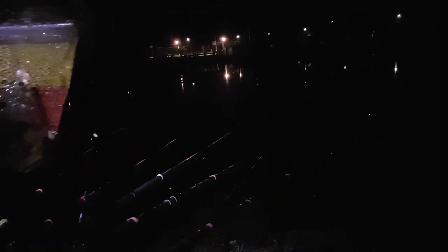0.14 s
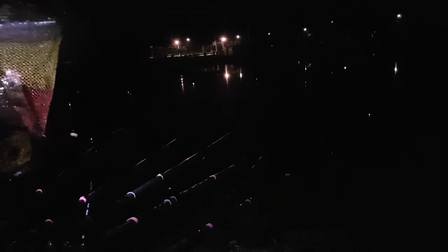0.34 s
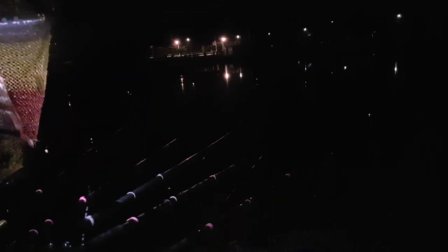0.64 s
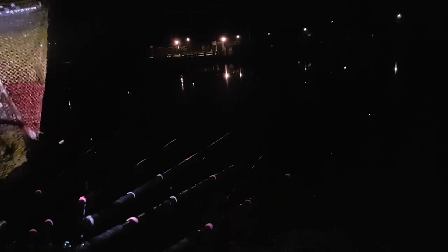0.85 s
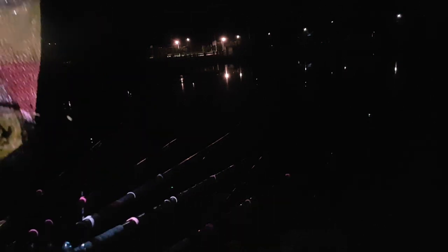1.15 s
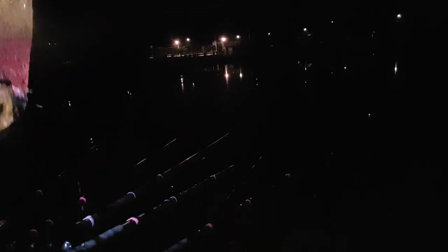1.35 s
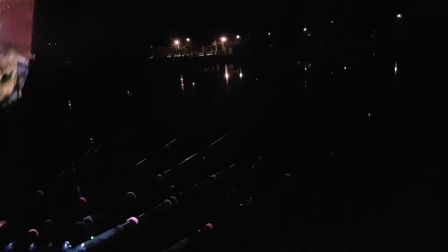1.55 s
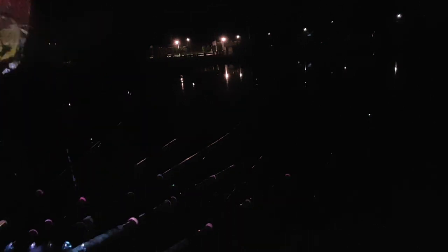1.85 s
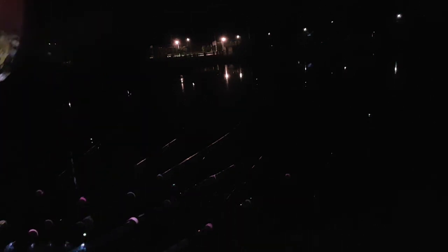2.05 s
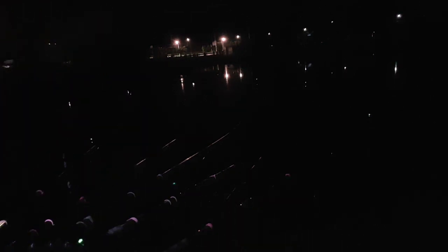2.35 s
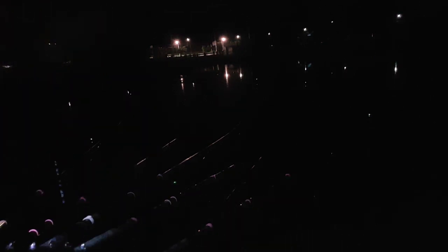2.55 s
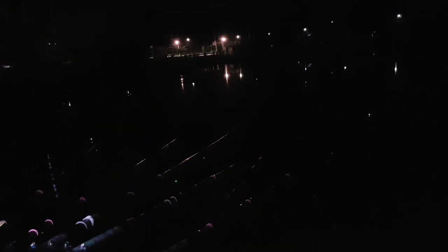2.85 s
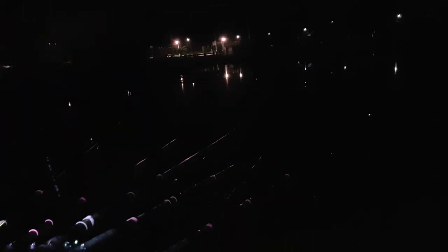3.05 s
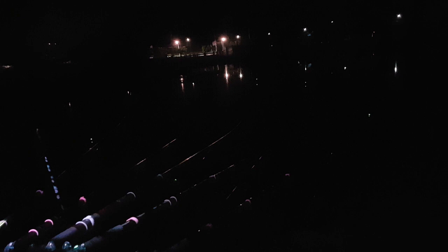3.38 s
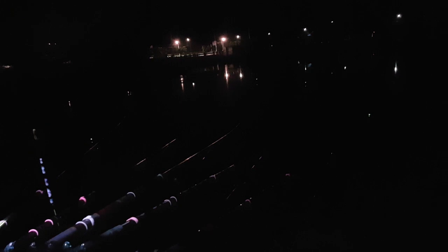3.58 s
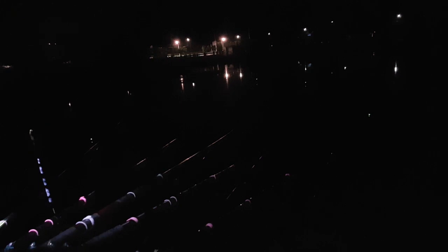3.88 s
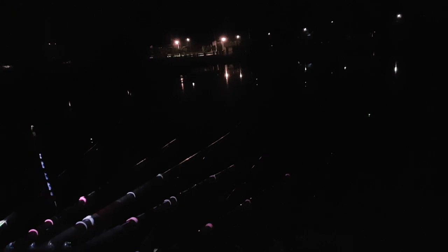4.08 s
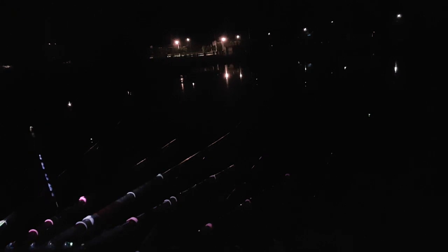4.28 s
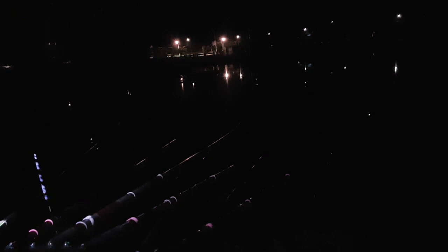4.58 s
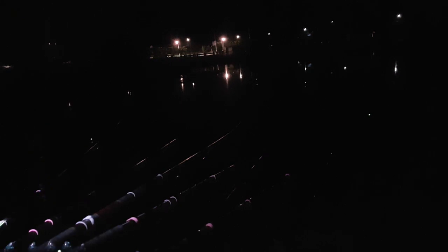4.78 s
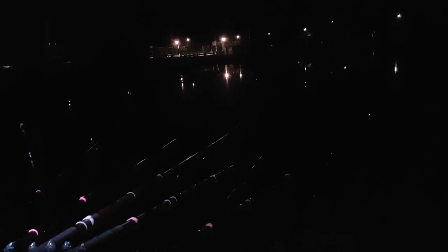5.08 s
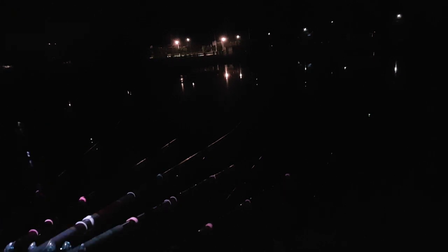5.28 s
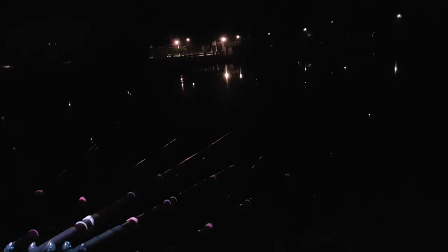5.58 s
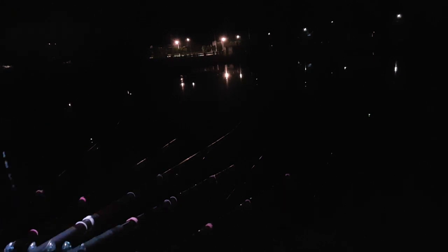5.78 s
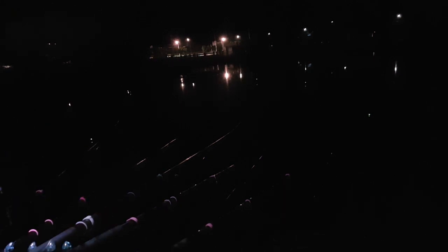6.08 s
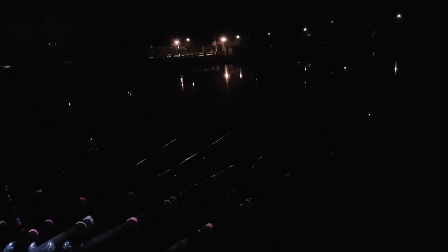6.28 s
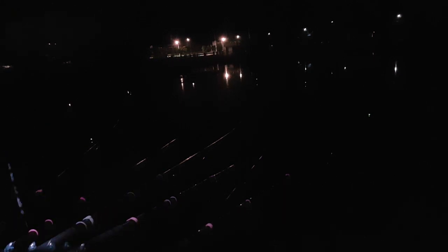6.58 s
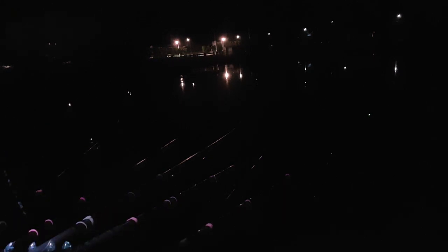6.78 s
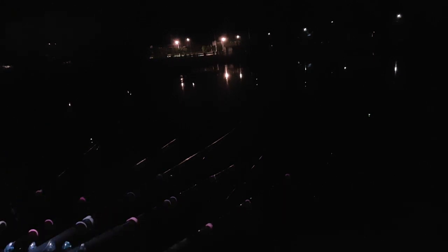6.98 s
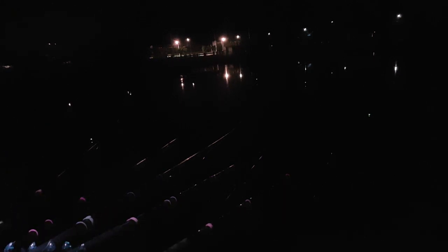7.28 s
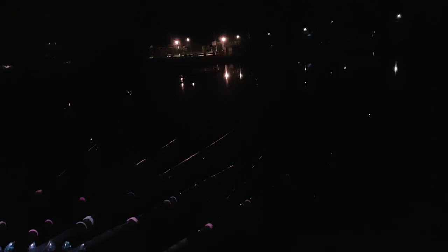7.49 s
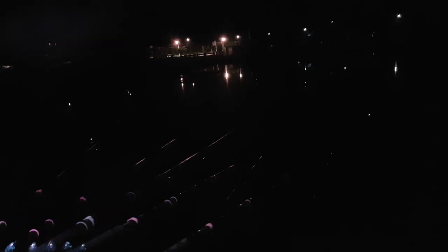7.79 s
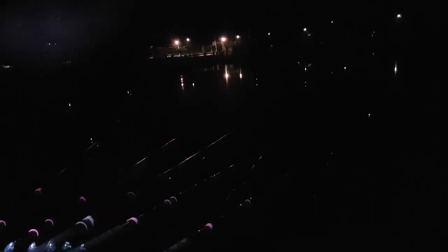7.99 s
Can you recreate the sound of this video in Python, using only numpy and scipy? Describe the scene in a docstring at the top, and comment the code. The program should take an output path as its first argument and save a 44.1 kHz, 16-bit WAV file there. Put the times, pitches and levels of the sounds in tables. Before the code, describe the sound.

A bullfrog croaks from a pond bank at night, seven low, buzzing, moo-like calls, each under a second long. The first is already sounding at the start; the others begin at about 0.8, 2.1, 3.4, 4.6, 5.9 and 7.2 seconds, with a slight echo. A duller, quieter frog overlaps the first six. Far off, an animal barks four times between 2.1 and 2.8 seconds, and faint barks and rising whoops return around 4.3 to 4.6 seconds and occasionally after 6. Close by on the left, fishing tackle ticks sharply, often in the first second or so, then sparsely. A strap creaks faintly near 0.8 and 2.7 seconds, and cloth rustles softly now and then. Two sharp clicks at 7.7 seconds lead into two soft knocks just before 8. A faint motor drone, traffic rumble and hiss continue underneath.

```python
"""Bullfrog at a night pond

A bullfrog moos seven times from the bank: its larynx snaps about 97 times a second and rings throat and
eardrums, while the vocal sac hums an octave above. A duller neighbour joins in, animals whoop and bark far off,
and a distant motor drones over traffic rumble. Beside the microphone, fishing tackle ticks and bumps, a reel
creaks and cloth rustles."""
import sys
import numpy as np
from scipy import signal
from scipy.fft import rfft, irfft, next_fast_len
from scipy.io import wavfile
from scipy.ndimage import uniform_filter1d

SR = 44100
rng = np.random.default_rng(int(sys.argv[2]) if len(sys.argv) > 2 else 0)


def transcribe(u):
    """Save the signal u as a 16-bit wav file named by the first command-line argument.

    u: samples, shape (n,) or (channels, n), limited to [-1, 1]; the rate is SR.
    q: integer samples, one column per channel.
    """
    v = np.clip(np.atleast_2d(u).T, -1, 1)
    q = np.round(v * 32767).astype(np.int16)
    wavfile.write(sys.argv[1], SR, q)


N = 358765
T = np.arange(N) / SR
HZ = np.maximum(np.fft.rfftfreq(2 * next_fast_len(2 * N // 3, real=True), 1 / SR), 1e-3)

# Table levels are relative; each source adds its own gain.
# bullfrog croaks: start_s, end_s, snap_hz, throat_db, sac_db, throat_fade_s, crescendo_db_per_s
FROG_CROAKS = [(-.36, 0.422, 96.4, -44, -41.5, 0.29, 0), (0.798, 1.623, 97.6, -45, -40, 0.23, 0),
               (2.149, 2.88, 99.2, -41.5, -37, 0.4, 1), (3.36, 4.28, 99.8, -42.5, -41.5, 0.62, 5),
               (4.569, 5.328, 98.8, -44, -42.5, 0.28, 10), (5.861, 6.595, 98.4, -44, -42, 0.29, 7.5),
               (7.19, 7.929, 99.4, -43.5, -43.5, 0.25, 6)]
# brief swells and dips in a croak: centre_s, half_width_s, sac_db, throat_db
CROAK_WAVERS = [(1.06, 0.03, -2, -2), (1.22, 0.15, 6, 2.5), (2.22, 0.066, -14, -0.5),
                (2.515, 0.036, -19, -0.5), (3.85, 0.085, 5, 2.5), (3.94, .022, -10, 3.5),
                (5.16, 0.055, 1.5, 2.5), (6.1, 0.025, -5, -4.5), (6.28, 0.083, -0.5, 2),
                (6.479, 0.061, 1.5, 6.5)]
# throat and eardrum modes at nominal tension: centre_hz, width_hz, gain_db
THROAT_MODES = [(269, 45, -8), (402, 50, -4), (515, 85, -10), (570, 77, -9), (737.5, 54, -6),
                (910, 60, -18), (1123.4, 92, 5), (1203, 23, 5), (1338, 156, -2.5), (1659, 92, 4),
                (1860, 38, -13), (2201, 83, -2.5), (2920, 1000, -3.5)]
# second frog's calls: start_s, length_s, peak_snap_hz, level_db
NEIGHBOUR_CALLS = [(-.05, .47, 94, -50.5), (0.903, 0.71, 96, -47.5), (2.247, 0.66, 97, -45.5),
                   (3.651, 0.62, 101.5, -45.5), (4.919, 0.461, 100, -51.5), (6.1, 0.505, 99.5, -50.5)]
# rising whoops: start_s, length_s, from_hz, to_hz, level_db
FAR_WHOOPS = [(4.292, 0.1, 924, 1396, -51.5), (4.506, 0.13, 970, 1363, -52), (6.858, 0.1, 964, 1290, -60),
              (8.062, 0.089, 938, 1366, -47.5)]
# arching barks: start_s, length_s, peak_hz, level_db
FAR_BARKS = [(2.11, 0.095, 595, -48.5), (2.32, 0.102, 568, -46.5), (2.51, 0.14, 593, -48.5),
             (2.71, 0.093, 611, -48), (4.35, 0.069, 697, -56), (4.595, 0.045, 730, -50),
             (6.23, 0.13, 595, -53), (6.87, 0.071, 720, -59)]
# tackle contacts: start_s, ring_db, crack_db, top_crack_db, base_t60_s
TACKLE_TICKS = [(0.019, -37, -43, -36, 0.038), (0.175, -59, -62, -35, 0.073), (.23, -36.5, -35, -26, 0.019),
                (.3137, -63, -47, -36, 0.027), (0.3626, -49, -51, -48, 0.091),
                (0.472, -64, -56, -32.5, 0.02), (.597, -38, -50, -47, 0.037), (.689, -44, -51, -63, 0.027),
                (0.9308, -39.5, -33, -25.5, 0.026), (1.1505, -27.5, -52, -57, .02),
                (1.5698, -56, -54, -46, .035), (2.3028, -53, -47, -32, .021),
                (2.7087, -39, -39.5, -52, 0.065), (3.189, -46.5, -45.5, -62, 0.052),
                (3.215, -50, -45, -56, 0.11), (3.2805, -50, -49, -36, 0.026),
                (4.1762, -43, -51, -57, 0.024), (4.2871, -58, -51, -43, .033),
                (5.5256, -64, -49, -54, .037), (6.198, -43, -47, -60, 0.054),
                (6.2328, -53, -42, -41, 0.027), (6.978, -70, -39, -52, 0.034),
                (7.7154, -70, -34.5, -30.5, 0.033), (7.7374, -38.5, -32.5, -24, 0.034)]
# mean slight contact: ring_db, crack_db, top_crack_db
FAINT_LEVELS_DB = (-55, -49.5, -44)
# modes of rods and rests: centre_hz, gain_db, t60_ratio
ROD_MODES = [(1964, -1, 3.2), (2320, -4, 2.1), (2634, 0.5, 1.5), (2950, 6, 0.45), (3210, 1, 1),
             (3650, -1, 0.97), (4120, 0, 0.97), (4720, -3, 0.67)]
# reel creaks: start_s, length_s, level_db
REEL_CREAKS = [(0.774, 0.14, -63), (2.687, 0.06, -56)]
# soft knocks on the gear: start_s, pitch_hz, level_db
GEAR_BUMPS = [(7.842, 453, -27.5), (7.929, 326, -23.5)]
# cloth movements: peak_s, rise_s, fall_s, level_db, extra_top_db
CLOTH_MOVES = [(.05, .2, .3, -56, -2), (1.24, 0.28, .27, -56, 6.5), (1.76, 0.094, 0.091, -58, 5),
               (2.479, 0.15, 0.18, -56, 10.5), (2.72, .13, 0.087, -48.5, 3), (3.24, 0.096, 0.11, -53.5, 3),
               (4.05, 0.25, 0.14, -54, -2), (6.22, 0.15, .16, -51, -1), (7.52, 0.25, 0.29, -53, 2),
               (7.85, 0.31, 0.69, -52.5, 1.5)]
# rustle spectrum: frequency_hz, density_db
CLOTH_SPECTRUM = [(1500, 11), (3000, 7), (5000, 0), (8500, -2), (12500, -5), (16000, 1)]
# motor partials: pitch_hz, level_db
MOTOR_PARTIALS = [(91.5, -53.5), (118.4, -55.5), (172.3, -57.5)]
# rumble and hiss spectrum: frequency_hz, density_db
NIGHT_SPECTRUM = [(25, -20), (58, -6.5), (80, -5.5), (102, -5), (135, -9.5), (175, -3), (210, -9.5),
                  (400, -16.5), (950, -17), (1600, -24.5), (3000, -29), (8500, -40.5), (12500, -35),
                  (16000, -33)]
# left-right likeness of rumble and hiss: frequency_hz, correlation
NIGHT_CORRELATION = [(100, 0.87), (250, 0.51), (600, 0.58), (1200, 0), (2500, 0.051), (16000, 0)]


def bullfrog(throat_db=2.5, nominal_hz=98.5, rebound_s=.003828, edge_hz=1950, echo_db=-5):
    """Each larynx snap rings the throat; the sac swings twice a snap as a nearly pure tone."""
    pitch_hz, throat_gain, sac_gain = croak_envelopes()
    # tension shifts the modes with the pitch: filter on a warped clock
    tension = (pitch_hz / nominal_hz) ** .7
    clock_s = np.cumsum(tension) / SR
    snaps, phase = larynx(np.interp(T, clock_s, pitch_hz / tension))
    air_puffs = .22 * unit(rng.standard_normal(N) * np.exp(-(phase % 1) / .8))
    modes = sum(undb(db) * resonance(hz, width_hz) for hz, width_hz, db in THROAT_MODES)
    radiation = 1 / np.sqrt(1 + (HZ / edge_hz) ** 10) / (1 + (230 / HZ) ** 8)
    rebound = 1 + .47 * np.exp(-2j * np.pi * HZ * rebound_s)
    ringing = shape(snaps + air_puffs, modes * radiation * rebound)
    buzz = steady(np.interp(clock_s, T, ringing)) * throat_gain * undb(throat_db)
    sac_swing = unit(np.sin(4 * np.pi * np.interp(clock_s, T, phase)))
    hum = sac_swing * sac_gain * undb(1.67 * walk(27))
    direct = place(buzz, left_db=1.8, left_lag_ms=.13) + place(hum, left_db=.44)
    return direct + undb(echo_db) * bank_echo(buzz + .14 * hum, t60_s=.33)


def croak_envelopes(attack_s=.33, release_s=.17, slack_hz=86.46, sag_s=.24, tighten_hz_per_db=.84):
    """One push of air per croak sets the snap rate and the gains of throat and sac."""
    pitch_hz, throat, sac = np.full(N, slack_hz), np.zeros(N), np.zeros(N)
    for start_s, end_s, snap_hz, throat_db, sac_db, fade_s, crescendo_db_per_s in FROG_CROAKS:
        pressure = ramp((T - start_s) / attack_s)
        swell_db = crescendo_db_per_s * (np.clip(T, start_s, end_s) - (start_s + end_s) / 2)
        rise_hz = snap_hz - slack_hz + tighten_hz_per_db * swell_db
        pitch_hz += pressure * ramp((end_s - T) / sag_s) * rise_hz
        throat += undb(throat_db) * pressure ** 1.05 * ramp((end_s - T) / fade_s) ** 2
        sac += undb(sac_db + swell_db) * pressure ** 1.09 * ramp((end_s - T) / release_s)
    for centre_s, half_width_s, sac_db, throat_db in CROAK_WAVERS:
        bell = np.exp(-((T - centre_s) / half_width_s) ** 2)
        throat *= undb(throat_db * bell)
        sac *= undb(sac_db * bell)
    return pitch_hz, throat, sac


def larynx(snap_hz, jitter_s=4e-5, scatter_db=3, sway_hz=29, sway_s=.00013):
    """One snap a cycle, hoarse from swaying early and late. Returns snaps and phase in cycles."""
    phase = np.cumsum(snap_hz * (1 + .005 * walk(28))) / SR
    cycles = np.arange(1, int(phase[-1]))
    jitter, scatter = rng.standard_normal((len(cycles), 2)).T
    due_s = np.interp(cycles, phase, T)
    snap_s = due_s + sway_s * np.sin(2 * np.pi * sway_hz * due_s) + jitter_s * jitter
    index = np.clip(snap_s, 0, T[-2]) * SR
    size, snaps = undb(scatter_db * scatter), np.zeros(N + 1)
    snaps[index.astype(int)] += size * (1 - index % 1)
    snaps[index.astype(int) + 1] += size * (index % 1)
    return unit(snaps[:N]), phase


def neighbour(echo_db=-3):
    """Only a second frog's low overtones pass the reeds; pitch and level arch together."""
    snap_hz, gain = np.full(N, 90.), np.zeros(N)
    for start_s, length_s, peak_hz, db in NEIGHBOUR_CALLS:
        arch = np.sin(np.pi * progress(start_s, length_s))
        snap_hz = np.where(T > start_s, peak_hz * (.92 + .08 * np.sqrt(arch)), snap_hz)
        gain += undb(db) * arch
    throat = (1.3 * resonance(291, 83) + .75 * resonance(378, 77)
              + .52 * resonance(560, 120) + .49 * resonance(930, 340))
    breathy_snaps = larynx(snap_hz)[0] + .56 * rng.standard_normal(N)
    call = unit(shape(breathy_snaps, throat / (1 + (HZ / 1300) ** 4))) * gain
    return place(call, left_db=1) + undb(echo_db) * bank_echo(call, t60_s=.28)


def far_animals(rasp_db=-7, undertone_db=-9, echo_db=-3):
    """Hoarse whoops rise over a falling undertone and barks arch; both echo across the water."""
    calls, waver, flutter = np.zeros(N), walk(218), undb(1.35 * walk(100) + 3.5)
    throat = sum(resonance(hz, 150) for hz in (890, 1730, 2090, 2630))
    rasp = unit(shape(rng.standard_normal(N), throat / (1 + (HZ / 3000) ** 4)))
    for start_s, length_s, from_hz, to_hz, db in FAR_WHOOPS:
        glide = progress(start_s, length_s)
        angle = phase_rad((from_hz + (to_hz - from_hz) * glide) * (1 + .035 * waver))
        undertone = np.sin(phase_rad(from_hz * (1.1 - .263 * glide)))
        voice = np.sin(angle) + undb(-19) * np.sin(2 * angle) + undb(undertone_db) * undertone
        swell = undb(db) * np.sin(np.pi * glide ** .74)
        calls += swell * (voice * flutter + 2 * glide * undb(rasp_db) * rasp)
    for start_s, length_s, peak_hz, db in FAR_BARKS:
        arch = np.sin(np.pi * progress(start_s, length_s))
        angle = phase_rad(peak_hz * (1 - .18 * (1 - arch) ** 2) * (1 + .06 * waver))
        calls += undb(db) * arch * flutter * (np.sin(angle) + undb(-13) * np.sin(2 * angle))
    return place(calls, left_db=1) + undb(echo_db) * bank_echo(calls, t60_s=.87)


def tackle(crack_gain_db=-5, ring_gain_db=-11, rebound_db=-15, top_t60_ratio=.72, left_db=5):
    """Hard contacts ring the rods and crack in two treble bands, then rebound weakly."""
    age_s = T[:SR // 4]
    layers = np.zeros((3, N + SR))
    for start_s, ring_db, crack_db, top_db, t60_s in TACKLE_TICKS + faint_ticks():
        log_decay = -np.log(1000) * age_s / t60_s
        ring = undb(ring_db) * rod_ring(age_s, log_decay)
        crack_gain = undb(crack_db) * np.exp(log_decay)
        top_gain = undb(top_db) * np.exp(log_decay / top_t60_ratio) / np.sqrt(top_t60_ratio)
        rebound_s = rng.uniform(.0056, .0176)
        for delay_s, gain in (0, 1), (rebound_s, undb(rebound_db)):
            i = int((start_s + delay_s) * SR)
            layers[:, i:i + len(age_s)] += gain * np.array([ring, crack_gain, top_gain])
    rings, crack_gain, top_gain = layers[:, :N]
    cracks = crack_gain * unit(shape(rng.standard_normal((2, N)), resonance(5600, 7400) ** 2))
    cracks += top_gain * unit(shape(rng.standard_normal((2, N)), resonance(17200, 16000) ** 2))
    rods = undb(ring_gain_db) * place(rings, left_db, left_lag_ms=.055)
    return rods + undb(crack_gain_db) * cracks * pan(left_db)


def rod_ring(age_s, log_decay, scatter_db=2, detune=.0094):
    """Each contact lands elsewhere and favours other rod modes."""
    ring = 0
    for hz, db, t60_ratio in ROD_MODES:
        strength, tuning = rng.standard_normal(2)
        tone = np.sin(2 * np.pi * hz * (1 + detune * tuning) * age_s)
        ring += undb(db + scatter_db * strength) * tone * np.exp(log_decay / t60_ratio)
    return ring


def faint_ticks(count=12, settle_s=2, scatter_db=3, t60_s=.033):
    """Slight random contacts, fewer as the gear settles. Rows as in TACKLE_TICKS."""
    return [(settle_s * rng.uniform() ** 1.4, *rng.normal(FAINT_LEVELS_DB, scatter_db), t60_s)
            for _ in range(count)]


def reel_creak(slip_hz=110, scrape_db=-4):
    """A reel's ratchet clicks in quick succession, scraping as it goes."""
    slip_count = np.floor(np.cumsum(slip_hz * (1 + .11 * walk(59.1))) / SR)
    slips = np.diff(slip_count, prepend=0)
    swell = sum(undb(db) * np.sin(np.pi * progress(start_s, length_s) ** 1.77)
                for start_s, length_s, db in REEL_CREAKS)
    ring = unit(shape(slips, resonance(3100, 340) * resonance(3660, 600)))
    scrape = unit(shape(rng.standard_normal(N), resonance(4800, 3000) ** 2))
    return place((ring + undb(scrape_db) * scrape) * swell, left_db=16, left_lag_ms=.029)


def gear_bumps(t60_s=.0057):
    """Soft knocks die within a few swings."""
    knocks = np.zeros(N)
    for start_s, hz, db in GEAR_BUMPS:
        age_s = np.maximum(T - start_s, 0)
        knocks += undb(db) * np.sin(2 * np.pi * hz * age_s) * np.exp(-np.log(1000) * age_s / t60_s)
    return knocks


def cloth(gain_db=1, rest_db=-67.5, grain_db=4, split_hz=10700):
    """Fibres slip in tiny grains, swelling with each movement and never quite still."""
    low_power = top_power = undb(rest_db) ** 2
    for peak_s, rise_s, fall_s, db, top_db in CLOTH_MOVES:
        width_s = np.where(T < peak_s, rise_s, fall_s)
        power = undb(db) ** 2 * np.exp(-2 * ((T - peak_s) / width_s) ** 2)
        low_power = low_power + power
        top_power = top_power + power * undb(top_db) ** 2
    slips = rng.standard_normal((2, N)) * undb(grain_db * walk(265))
    grains = unit(shape(slips, undb(log_curve(CLOTH_SPECTRUM))))
    low = shape(grains, 1 / (1 + (HZ / split_hz) ** 10))
    rustle = low * np.sqrt(low_power) + (grains - low) * np.sqrt(top_power)
    return undb(gain_db) * rustle * pan(left_db=5)


def night_air(level_db=-51):
    """Far traffic rumble and faint hiss, most alike left and right in the bass."""
    correlation = np.clip(log_curve(NIGHT_CORRELATION), 0, .99)
    spectrum = undb(log_curve(NIGHT_SPECTRUM))
    mid = shape(rng.standard_normal(N), spectrum * np.sqrt(1 + correlation))
    side = shape(rng.standard_normal(N), spectrum * np.sqrt(1 - correlation))
    return unit(np.array([mid + side, mid - side])) * undb(level_db + .5 * walk(27))


def motor(gain_db=-2, wander_hz=3, waver_db=3.6):
    """A distant drone; each partial wavers in pitch and level."""
    drone = np.zeros(N)
    for hz, db in MOTOR_PARTIALS:
        tone = np.sin(phase_rad(hz + wander_hz * walk(12.1)))
        drone += undb(db) * unit(tone * undb(waver_db * walk(9.3)))
    return undb(gain_db) * drone


def bank_echo(x, t60_s, gap_s=.008):
    """Diffuse echo from reeds and banks, different in each channel."""
    age_s = T[:SR]
    tail = rng.standard_normal((2, SR)) * np.exp(-np.log(1000) * age_s / t60_s) * (age_s > gap_s)
    return signal.fftconvolve(x[None], tail / np.sqrt(np.sum(tail ** 2) / 2), axes=1)[:, :N]


def place(x, left_db, left_lag_ms=0):
    """Level step and delay between two microphone ports."""
    left = shape(x, np.exp(-2j * np.pi * HZ * left_lag_ms / 1000))
    return np.array([left, x]) * pan(left_db)


def pan(left_db):
    """Stereo gains, left_db apart."""
    return undb([[left_db / 2], [-left_db / 2]])


def steady(x, window_s=.0059):
    """A self-sustained oscillation limits its own swing: level out its power."""
    size = int(window_s * SR)
    power = uniform_filter1d(uniform_filter1d(x ** 2, size), size)
    return x / np.sqrt(np.maximum(power, 1e-12))


def resonance(hz, width_hz):
    """One damped mode, gain 1 at its centre."""
    return 1 / (1 + 1j * (HZ ** 2 - hz ** 2) / (HZ * width_hz))


def shape(x, response):
    """Filter by a response on HZ."""
    return irfft(rfft(x, 2 * (len(HZ) - 1)) * response)[..., :N]


def log_curve(points):
    """Join (hz, value) points over log frequency."""
    hz, value = np.transpose(points)
    return np.interp(np.log(HZ), np.log(hz), value)


def walk(rate_hz):
    """Smooth random drift, rms 1."""
    return unit(shape(rng.standard_normal(N), np.exp(-(HZ / rate_hz) ** 2)))


def phase_rad(hz):
    """Running phase of a varying pitch."""
    return 2 * np.pi * np.cumsum(hz) / SR


def progress(start_s, length_s):
    """Linear 0 to 1 over an event."""
    return np.clip((T - start_s) / length_s, 0, 1)


def ramp(x):
    """Quarter-sine rise from 0 to 1."""
    return np.sin(np.pi / 2 * np.clip(x, 0, 1))


def undb(db):
    """Decibels to gain."""
    return 10 ** (np.asarray(db) / 20)


def unit(x):
    """Scale to rms 1."""
    return x / np.sqrt(np.mean(x ** 2))


def scene():
    """The pond from the bank."""
    animals = bullfrog() + neighbour() + far_animals()
    gear = tackle() + reel_creak() + gear_bumps() + cloth()
    return animals + gear + night_air() + motor()


def record(dry, top_hz=15900):
    """The recorder cuts the top."""
    return signal.sosfilt(signal.ellip(10, .2, 80, top_hz, fs=SR, output="sos"), dry)


dry = scene()
out = record(dry)
transcribe(out)
```